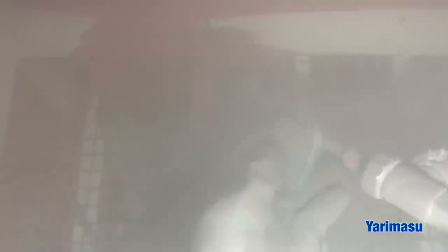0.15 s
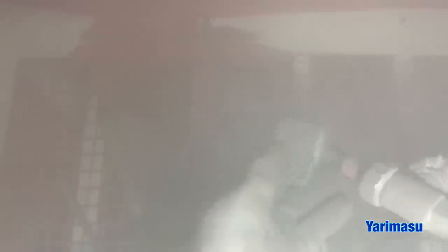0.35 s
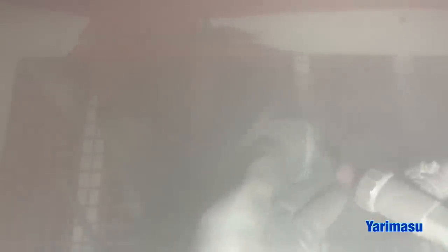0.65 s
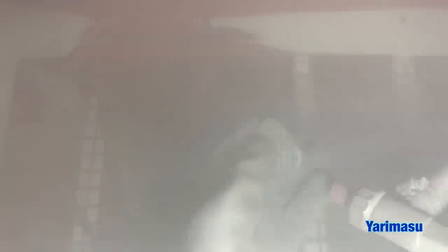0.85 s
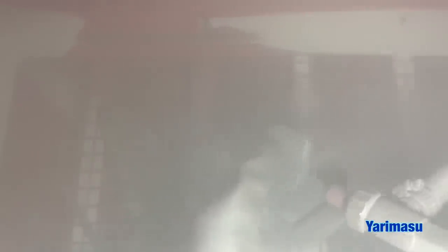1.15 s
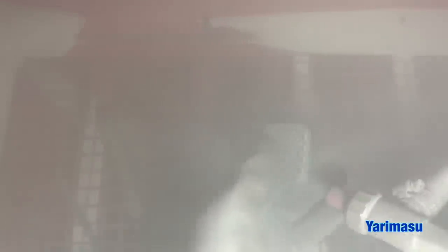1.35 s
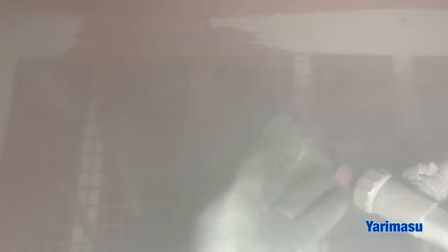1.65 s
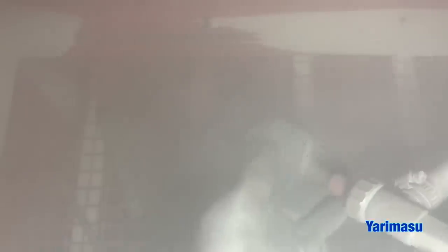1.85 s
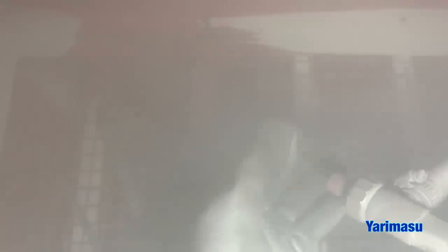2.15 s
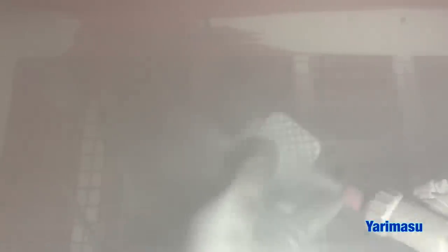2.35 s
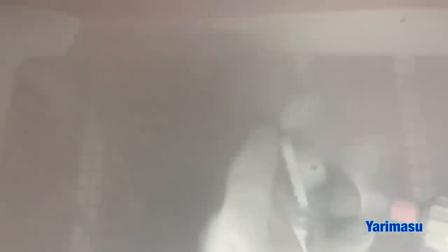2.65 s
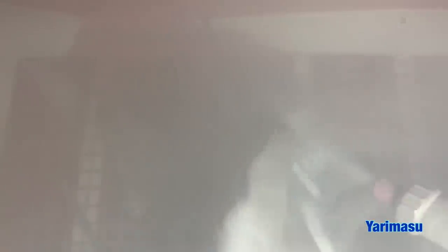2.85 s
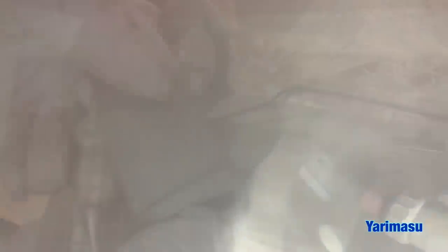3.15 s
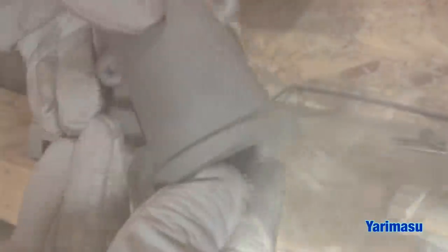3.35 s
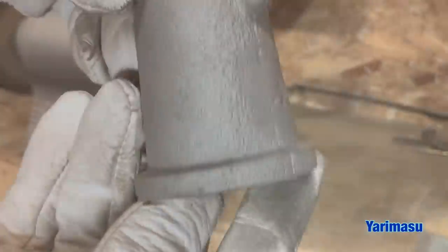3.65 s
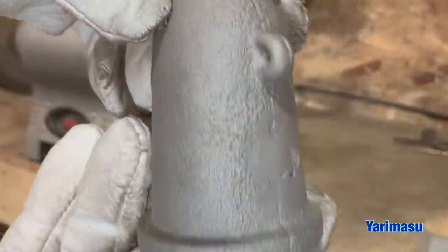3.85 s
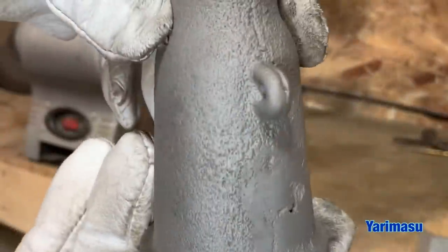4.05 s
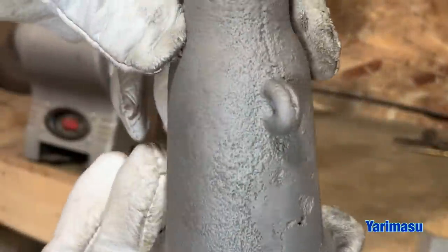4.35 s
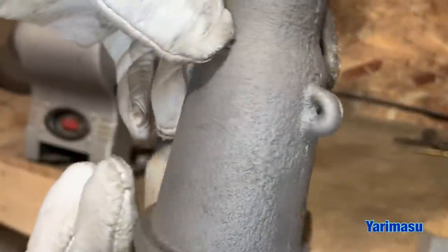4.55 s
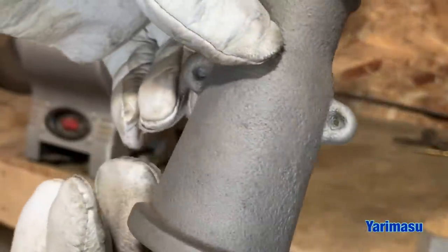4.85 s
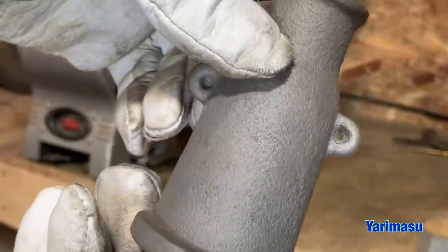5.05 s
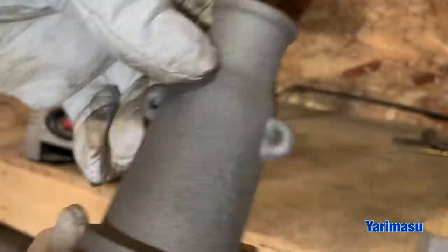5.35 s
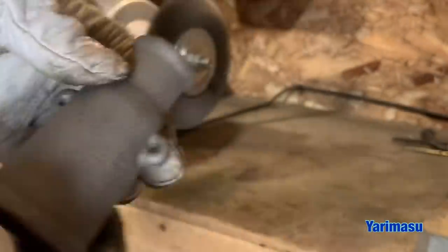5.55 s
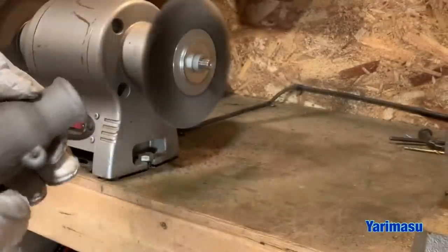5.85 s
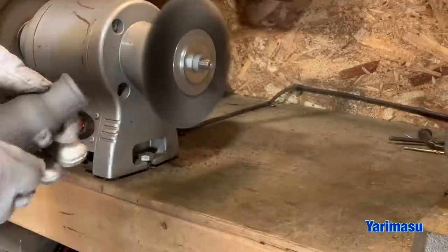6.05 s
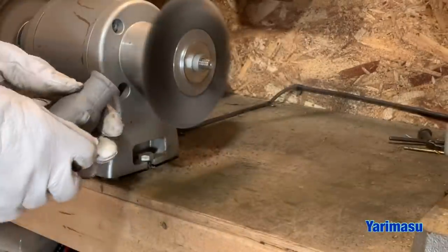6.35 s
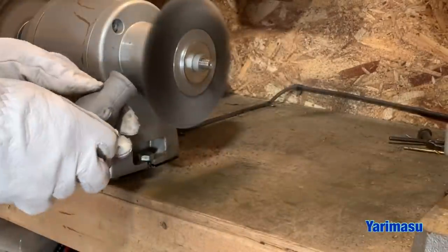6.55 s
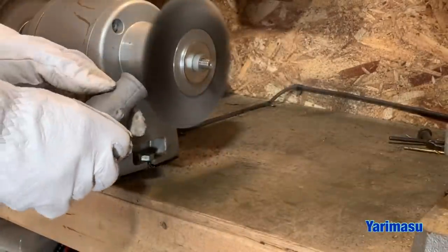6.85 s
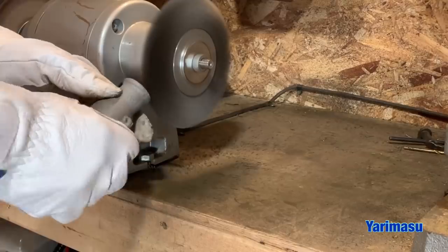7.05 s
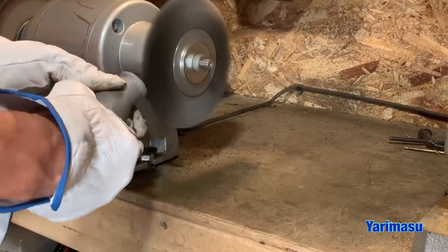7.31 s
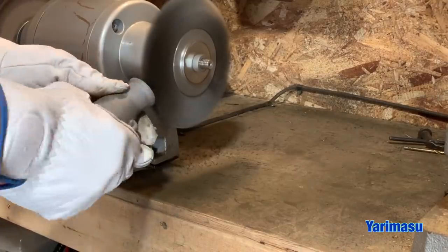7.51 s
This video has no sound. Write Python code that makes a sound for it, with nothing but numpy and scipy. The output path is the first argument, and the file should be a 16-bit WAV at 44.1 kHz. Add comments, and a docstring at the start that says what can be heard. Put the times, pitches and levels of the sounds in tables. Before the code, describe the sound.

Loud sandblasting hiss and throbbing boxy roar cut abruptly at about four seconds to a quiet humming bench grinder, then a casting brushes its wire wheel.

```python
"""Sandblasting cabinet, then bench grinder

A turbulent jet of air and grit hisses on a casting while the steel box roars and resonates and machine tones drone.
At 4.12 s the scene changes abruptly to an idling grinder: harmonic hum, whirring wire wheel, fluttering bearing.
From 6.8 s the casting is held to the wheel: friction scratches, rings it and whistles thinly, and the hum sags.
Noises are shaped random spectra, tones are shaken sinusoids, and both reach two microphone ports."""
import sys
import numpy as np
from scipy import signal
from scipy.fft import rfft, irfft, next_fast_len
from scipy.io import wavfile
from scipy.ndimage import uniform_filter1d

SR = 44100
rng = np.random.default_rng(int(sys.argv[2]) if len(sys.argv) > 2 else 0)


def unload_audio(sound):
    """Save the sound as a 16-bit wav file, at the path given as the first command line argument."""
    columns = np.transpose(np.atleast_2d(sound))
    # keep every value between -1 and 1, then stretch to whole-number steps
    steps = np.round(np.clip(columns, -1, 1) * 32767)
    wavfile.write(sys.argv[1], SR, steps.astype(np.int16))


N = 338688
T = np.arange(N) / SR  # seconds
CHANGE_S = 4.117

# In all tables: levels [dB] and densities [dB per Hz] hold before the trims and modulations in the functions;
# balance_db is left over right; lead_rad is how far left leads, which resonances reduce below 250 Hz.

# Air and grit leaving the nozzle: freq_hz [Hz], density_db [dB per Hz], balance_db [dB]
JET_SPECTRUM = [(1040, -73.5, -12), (1660, -63, 2.5), (2190, -59.3, 5), (2600, -60.3, 9), (3370, -58.8, 10),
                (3850, -59.5, 7.5), (4770, -59.5, 2), (5250, -65, -2), (6100, -71.5, -2.5),
                (7100, -70.5, 0), (8400, -61.5, 0), (9200, -63.5, 0), (10200, -61, 0), (11600, -58, 0),
                (12400, -61, 0), (14340, -63.5, 0), (15500, -75, 0)]
# Steady splash on the casting, drifting as it is turned; only its changes count: start_s [s], level_db [dB]
SPLASH_LEVEL = [(0.0, -27), (0.38, -24.5), (1.32, -24), (2.01, -27.5), (2.61, -26.5), (2.95, -27),
                (3.65, -26), (3.92, -27)]
# Peaks and notches put into the hiss by reflections in the box: centre_hz [Hz], width_hz [Hz], gain_db [dB]
REFLECTION_COLOUR = [(1780, 120, -2), (2560, 70, 1.5), (2820, 70, -2), (2915, 55, 4), (3070, 80, -3.5),
                     (3250, 70, 1.5), (3900, 70, -1.5), (4070, 90, 2), (4280, 70, -2), (4405, 80, 4.5),
                     (4830, 80, 2), (4960, 90, -2.5), (5140, 70, 1.5), (6630, 130, 2.5), (6950, 110, -2.5),
                     (8100, 110, 1.5), (8250, 110, -1.5), (8700, 130, 1.5), (12830, 130, 2)]
# Flares as the jet catches an edge: peak_s [s], length_s [s], centre_hz [Hz], splash_db [dB], spray_db [dB]
EDGE_FLARES = [(1.16, .04, 3300, 1.3, 1), (1.24, 0.05, 3240, 1.5, 1), (1.875, 0.054, 3320, 4, .5),
               (2.215, .075, 3500, 5, 2.5), (2.497, .068, 4600, 6, 2), (2.61, 0.05, 3350, 5.2, 3),
               (2.787, 0.036, 3300, 1.5, 1), (3.06, 0.035, 3400, 4.5, 2.5), (3.335, .03, 3400, 2, .5)]
# The splash fills a broad band; the fine spray outside it follows by a smaller share.
SPLASH_HZ, SPLASH_WIDTH_HZ, SPLASH_SHARE, SPRAY_SHARE = 3300, 2700, 1.05, .3
# Each flare lifts a band around its centre and a band of bright spray.
FLARE_WIDTH_HZ, SPRAY_HZ, SPRAY_WIDTH_HZ = 1500, 7800, 1900

# Turbulent air in the box: freq_hz [Hz], density_db [dB per Hz], balance_db [dB]
ROAR_SPECTRUM = [(15, -49.5, -1), (60, -55, 1), (135, -62, 1), (218, -62.5, 0), (317, -63, -10),
                 (474, -54.3, 2), (610, -59.8, -2), (1030, -61.5, 0), (1590, -61.3, 1), (2260, -61, 3),
                 (4060, -117, 11)]
# Notches cut into the roar by standing waves: centre_hz [Hz], width_hz [Hz], gain_db [dB]
STANDING_WAVE_NOTCHES = [(217, 16, -7), (438, 14, -8), (587, 20, -6), (647, 9, -9), (665, 14, -4),
                         (702, 16, -4)]
# Resonances of box and panels: centre_hz [Hz], width_hz [Hz], density_db [dB per Hz], balance_db [dB],
# lead_rad [rad]
CABINET_MODES = [(38, 5.8, -49.5, -1, 0), (101, 15, -51.5, 1.5, 0.5), (112.5, 1.8, -48.5, 0, 0.8),
                 (170, 12, -49, 6, 0.2), (185, 10, -45.5, -3, -.2), (200, 9, -46, -3, -0.2),
                 (248, 11, -49, -8, 0.2), (274, 23, -54, 3, -0.5), (338.5, 18.4, -53.5, 10, 0),
                 (360, 14, -40.8, -8, 0.6), (395, 17, -51, -6, 0), (548, 14, -45.5, 6, -1.6),
                 (742, 15, -50.5, 9, 1.4), (757, 12, -51, -2, -1.4), (792, 26, -52, 0, 1.5),
                 (1452, 22, -56, 0, .2), (1689, 16, -60, 0, .1), (2030, 37, -61, 1, -1.2)]
# Tones of dust fan and air supply: pitch_hz [Hz], level_db [dB rms], balance_db [dB], lead_rad [rad],
# unsteadiness [ratio]
DRONE_TONES = [(37.9, -42, 0, 0, .4), (113.8, -44, 3, .2, .4), (146.7, -48, 2, -.8, .3),
               (157, -35.5, 10, .1, .2), (167.1, -39.5, 4, .2, .2), (179.7, -38.5, -1, .2, .3),
               (189.7, -21.6, -5, -.2, .11), (205.1, -42, -5, -.2, .3), (227.9, -23.6, -4, 0, .02),
               (250.7, -40.5, -5, -.6, .3), (260.9, -44, -5, -.5, .3), (364.7, -38.5, -8, .7, .4),
               (526.9, -44, -2, .7, .4), (549.8, -34.5, 5, -1.8, .55), (626.3, -43, -6, .3, .55),
               (686.5, -40.5, 0, 2.3, .4), (759.3, -40.5, -2, -1.4, .5), (860.7, -46, -4, -2.3, .5),
               (893, -50.5, -6, 1.1, .5), (968.3, -50, 8, 1.5, .5), (1061.9, -50.5, 5, 1.3, .5),
               (1215.5, -47, -2, .3, .6), (1310.8, -41.5, -2, -.2, .5), (1444.1, -47, -2, .4, .5),
               (1595.5, -48, 5, -.9, .5)]
# Edges of the low bands whose level is held steady: edge_hz [Hz]
LEVELLED_BAND_EDGES = [0, 70, 140, 290, 450, 660, 900]

# Mean pitch of the grinder's hum, sagging under load: start_s [s], pitch_hz [Hz]
HUM_PITCH = [(4.1, 49.6), (6.8, 49.6), (7.05, 49.3), (7.22, 48.7), (7.48, 48.7), (7.58, 48.2), (7.68, 48.3)]
FULL_LOAD_SAG_HZ = .9  # the hum has its loaded colour once it has sagged this far
# Partials of the idling hum: multiple [ratio], level_db [dB]
IDLE_PARTIALS = [(1, 1), (2, -13), (3, -13), (4, -13), (5, -11), (6, -33), (7, -15), (8, -20.5), (9, -31),
                 (10, -33), (11, -25), (12, -25), (13, -17.5), (14, -28), (15, -36), (16, -28), (17, -30),
                 (18, -23), (19, -20.5), (20, -16.5), (21, -26), (22, -29), (23, -25), (24, -26), (26, -29),
                 (33, -34), (34, -31), (44, -36)]
# Partials of the hum under load: multiple [ratio], level_db [dB]
LOADED_PARTIALS = [(1, -2), (2, -17), (3, -9), (4, -9), (5, -3), (6, -20), (7, -8.5), (8, -17), (9, -9),
                   (10, -22), (11, -20), (12, -21), (13, -17), (15, -22), (16, -21), (17, -14), (18, -24),
                   (19, -25), (20, -13), (21, -21), (24, -23), (26, -28), (44, -38)]
PHASE_JUMP_S, PHASE_JUMP_CYCLES = 7.058, 0.296  # the hum's phase jumps back once by a share of a cycle
# Judders after one hard press and at the end of the next: start_s [s], length_s [s],
# gain_db [dB on the loaded hum's low overtones]
WHEEL_JUDDERS = [(7.29, 0.2, 11), (7.61, .06, 9)]
SMOOTH_RUN_DB, JUDDER_RAMP_S = -10, .05  # offset of those overtones, added with or without judder; ramp
# Rough growl while juddering: centre_hz [Hz], width_hz [Hz], density_db [dB per Hz], balance_db [dB],
# lead_rad [rad]
GROWL_MODES = [(245, 30, -71, 0, 0), (370, 120, -79, 0, 0)]

# Air stirred by the wheel: freq_hz [Hz], density_db [dB per Hz], balance_db [dB]
WINDAGE_SPECTRUM = [(20, -97, 0), (60, -91, 0), (110, -85.5, 0), (190, -84.5, 0), (270, -78.5, 0),
                    (364, -75, 1), (543, -80, 2), (810, -86, 2), (1000, -82, 3), (1290, -83.5, 2),
                    (1970, -93.5, 2), (2950, -94.5, .5), (3500, -97, .5), (5970, -98.6, -2),
                    (8500, -91.6, 0), (12000, -95.5, 0), (15600, -106, 0)]
WINDAGE_RISE_DB_PER_S = .5
DIP_S, DIP_LENGTH_S, DIP_DB = 5.34, 0.23, -4.5  # the low whirr dips once
REPEAT_SHARE = .2  # share of the whirr's power that repeats on every turn of the wheel
# Housing tones rung by the bearing knock: pitch_hz [Hz], level_db [dB]
HOUSING_TONES = [(285, -53), (366, -43.5), (455, -56.5), (600, -57), (1030, -59), (1230, -59)]
# Where in the turn the knock peaks (share of a turn), its swell, and the relative scatter of its pitches
KNOCK_PLACE, KNOCK_SWELL_S, KNOCK_SCATTER = .38, .0055, .06
KNOCK_ALTERNATE_DB, KNOCK_CHANCE_DB = 1.0, 1.0  # knocks alternate by plus and minus this; chance spread

# Presses of casting on wheel: start_s [s], length_s [s], brush_db [dB], whistle_db [dB]
CASTING_PRESSES = [(6.762, .11, .7, -7), (6.948, .07, 3.3, -6), (7.09, .175, .3, 1), (7.48, .17, .5, 3.5)]
# The wires bite and let go quickly; their whistle takes longer to build up.
BITE_S, RELEASE_S, WHISTLE_BUILD_S = 0.034, 0.035, 0.084
REST_S, REST_BRUSH_DB, REST_WHISTLE_DB = 6.96, -1.3, -14.5  # light resting contact from here on
# Scratch of the wires: freq_hz [Hz], density_db [dB per Hz], balance_db [dB]
BRUSH_SPECTRUM = [(200, -82, 1), (450, -83, -2), (1300, -90, 3), (2100, -88.5, 3), (3800, -91, 0),
                  (4700, -91.5, -2), (6200, -98, -2), (8500, -92, 0), (11000, -93, 0), (13400, -94, 0),
                  (15500, -100, 0)]
# Notches between the casting's resonances: centre_hz [Hz], width_hz [Hz], gain_db [dB]
SCRATCH_NOTCHES = [(1380, 90, -4), (1600, 90, -4), (1910, 130, -4), (3290, 150, -7), (3720, 260, -4),
                   (4280, 150, -4), (5600, 140, -5)]
# Ring of the casting: centre_hz [Hz], width_hz [Hz], density_db [dB per Hz], balance_db [dB], lead_rad [rad]
CASTING_MODES = [(820, 36, -75.5, 2, -0.56), (995, 39, -75, 2, -0.21), (1190, 40, -78.5, 2, 0),
                 (1470, 50, -86, 2, 0), (1725, 35, -83, 0, -.8), (2040, 40, -86, 2, 0),
                 (2240, 30, -89, 2, 0), (2390, 28, -86, 2, 0.36), (3075, 90, -85.5, 0, 1.2),
                 (4550, 110, -87, -3, .8), (4760, 170, -92, -3, 0), (5040, 110, -91, -3, 0),
                 (5320, 110, -96, -4, -1.3)]
# Whistle of the wire tips: centre_hz [Hz], width_hz [Hz], density_db [dB per Hz], balance_db [dB],
# lead_rad [rad]
WHISTLE_MODES = [(11470, 80, -68.5, 0, 2.2), (11750, 130, -77, 0, 2.0), (11500, 500, -86, 0, 2.4)]

# Soft knocks as the gloves shift on the casting: start_s [s], level_db [dB]
GLOVE_TOUCHES = [(5.605, -3), (5.851, 3), (5.965, -4), (6.325, -2), (6.965, -1), (7.115, -4)]
TOUCH_RISE_S, TOUCH_DECAY_S = .002, .013
# Glove-damped ring of the casting: centre_hz [Hz], width_hz [Hz], density_db [dB per Hz], balance_db [dB],
# lead_rad [rad]
GRIPPED_MODES = [(1040, 170, -69, 2, -.2), (1230, 200, -75, 2, 0)]
TICK_S, TICK_HZ, TICK_DB, TICK_DECAY_S = 5.208, 8600, -40, .0012
# Soft rubs of the gloves: start_s [s], length_s [s], centre_hz [Hz], width_hz [Hz], level_db [dB rms]
GLOVE_RUBS = [(6.13, .13, 570, 140, -54), (6.42, .25, 1220, 300, -57.5)]
RUB_RAMP_S = .04

# The two microphone ports: freq_hz [Hz], likeness [0-1], lead_rad [rad]
PORT_LIKENESS = [(30, .99, 0), (300, .9, 0), (700, .5, 0), (1500, .55, -1), (2400, .3, -1.5),
                 (3200, .3, -3.5), (4500, .25, -5.8), (6000, .15, -6.3), (7200, .95, -6.3),
                 (8000, .9, -6.4), (8600, .72, -7.3), (9400, .65, -8.4), (9900, .98, -9.35),
                 (10400, 1, -9.42), (10900, .99, -9.5), (11400, .85, -10.2), (12300, .7, -11.2),
                 (13300, .98, -12.55), (15500, .9, -12.57)]
BAND_LIMIT_HZ = 15730


def jet(spurt_db=0.3, grit_db=0.25, patch_db=.7, hiss_db=-.2, ripple_db=.5):
    """Turbulent mixing noise: the hiss changes colour as the casting turns; uneven grit feed roughens it."""
    hz, s, z = signal.stft(rush(JET_SPECTRUM), SR, nperseg=1024, noverlap=768)
    hz = hz[:, None]
    splash = np.interp(s, *np.transpose(SPLASH_LEVEL))
    splash = splash - np.mean(splash[s < CHANGE_S])
    near = bell(hz, SPLASH_HZ, SPLASH_WIDTH_HZ)
    db = hiss_db + splash * (near * SPLASH_SHARE + (1 - near) * SPRAY_SHARE)
    db = db + sum(gain_db * bell(hz, centre, width) for centre, width, gain_db in REFLECTION_COLOUR)
    db = db + ripple_db * rng.standard_normal(hz.shape)  # fine ripple from the many later reflections
    for at, length, centre, splash_db, spray_db in EDGE_FLARES:
        splash_lift = splash_db * bell(hz, centre, FLARE_WIDTH_HZ)
        spray_lift = spray_db * bell(hz, SPRAY_HZ, SPRAY_WIDTH_HZ)
        db = db + bell(s, at, length) * (splash_lift + spray_lift)
    # patches of chance level, smoothed over frequency and then time
    patches = uniform_filter1d(rng.standard_normal(db.shape), size=8, axis=0)
    patches = evened(uniform_filter1d(patches, size=16, axis=1))
    hiss = signal.istft(z * amp(db + patch_db * patches), SR, nperseg=1024, noverlap=768)[1][:, :N]
    return hiss * amp(spurt_db * wander(rate_hz=16) + grit_db * wander(rate_hz=340))


def cabinet(roar_db=0., panels_db=0.):
    """Forced resonance: the box roars and rings with the air blown into it."""
    roar = rush(ROAR_SPECTRUM, STANDING_WAVE_NOTCHES)
    return amp(roar_db) * roar + amp(panels_db) * ringing(CABINET_MODES)


def drone(flutter_hz=3.5):
    """Beating of steady tones: the two strongest throb at 38 Hz, and turbulence shakes them all."""
    out, on = np.zeros((2, N)), slice(int((CHANGE_S + .1) * SR))
    for hz, db, balance_db, lead, unsteady in DRONE_TONES:
        out[:, on] += partial(hz * T[on], unsteady, flutter_hz, amp(db) * ports(balance_db, lead))
    return out


def grinder():
    """Superposition: hum, windage and bearing of the turning wheel, plus friction and handling of the casting."""
    hz, = curve(HUM_PITCH)
    turns = np.cumsum(hz * (1 + 0.000988 * wander(rate_hz=1.9))) / SR  # cycles of hum, two per wheel turn
    load = np.clip((hz.max() - hz) / FULL_LOAD_SAG_HZ, 0, 1)
    brushing, whistling = contact()
    friction = brushing * scratch(turns) + whistling * ringing(WHISTLE_MODES)
    return hum(turns, load) + windage(turns, load) + friction + growl() + handling() + rubbing()


def hum(turns, load, hum_db=-42.5, loaded_db=0., unsteady=0.24, rubbing=0.2, flutter_hz=4.3):
    """Harmonic vibration: load trades fundamental for overtones and makes them flutter."""
    out, on = np.zeros((2, N)), slice(int(CHANGE_S * SR), N)
    phase_jump = PHASE_JUMP_CYCLES * np.clip((T - PHASE_JUMP_S) / 0.019 + .5, 0, 1)
    turns = (turns - phase_jump)[on]
    judder = SMOOTH_RUN_DB
    for start, length, db in WHEEL_JUDDERS:
        judder = judder + db * gate(start, length, JUDDER_RAMP_S, JUDDER_RAMP_S)
    load, judder = load[on], judder[on]
    for k, idle_db in IDLE_PARTIALS:
        pressed_db = np.interp(k, *np.transpose(LOADED_PARTIALS)) + loaded_db
        pressed_db = pressed_db + judder * bell(k, 6.6, 4.0)
        depth = (unsteady + rubbing * load) * (1 - 1 / k) ** 2  # the fundamental stays steady
        pair = ports(0., 0.045 * k * rng.standard_normal())
        level = amp(idle_db + load * (pressed_db - idle_db))
        out[:, on] += level * partial(round(k) * turns, depth, flutter_hz, pair)
    return amp(hum_db) * out


def windage(turns, load, air_db=-.3, load_db=-2.0, gust_db=.6):
    """Rotational modulation of stirred air: its low whirr partly repeats, flutters with the bearing and dips."""
    wind = rush(WINDAGE_SPECTRUM)
    low = signal.sosfiltfilt(signal.butter(2, 1800, fs=SR, output="sos"), wind)
    whirr = recurring(low, turns, share=REPEAT_SHARE)
    whirr = whirr * swish(turns, depth=0.48) * amp(gust_db * wander(rate_hz=6))
    dip = amp(DIP_DB * gate(DIP_S, DIP_LENGTH_S, attack_s=.04, release_s=.02))
    whirr = (whirr + rattle(turns)) * dip
    level_db = air_db + WINDAGE_RISE_DB_PER_S * (T - CHANGE_S) + load_db * load
    return amp(level_db) * (whirr + (wind - low) * swish(turns, depth=0.17))


def scratch(turns, brush_db=-1.2, ring_db=-2.0, snag_db=1.0, tips_db=1.5):
    """Friction excitation: the wires scratch in broad noise and ring the casting's modes."""
    wires = amp(brush_db) * rush(BRUSH_SPECTRUM, SCRATCH_NOTCHES) * swish(turns, depth=0.18)
    ring = amp(ring_db) * ringing(CASTING_MODES)
    # wires snag and their tips tick
    return (wires + ring) * amp(snag_db * wander(rate_hz=70) + tips_db * wander(rate_hz=300))


def contact():
    """Power addition: light resting contact and each press set the strength of brushing and whistle."""
    resting = np.clip((T - REST_S) / BITE_S, 0, 1)
    brushing = (amp(REST_BRUSH_DB) * resting) ** 2
    whistling = (amp(REST_WHISTLE_DB) * resting) ** 2
    for start, length, brush_db, whistle_db in CASTING_PRESSES:
        brushing = brushing + (amp(brush_db) * gate(start, length, BITE_S, RELEASE_S)) ** 2
        whistling = whistling + (amp(whistle_db) * gate(start, length, WHISTLE_BUILD_S, RELEASE_S)) ** 2
    return np.sqrt(brushing), np.sqrt(whistling)


def growl():
    """Gated resonance: the wheel chatters roughly against the casting during each judder."""
    juddering = sum(gate(start, length, JUDDER_RAMP_S, JUDDER_RAMP_S) for start, length, _ in WHEEL_JUDDERS)
    return ringing(GROWL_MODES) * juddering


def swish(turns, depth):
    """Periodic modulation: uneven wire tufts pass once every two hum cycles, more weakly in between."""
    angle = np.pi * (turns - 2 * KNOCK_PLACE)
    tufts = np.exp(3 * (np.cos(angle) - 1)) + 0.84 * np.exp(6 * (np.cos(2 * angle) - 1))
    return evened(1 + depth * tufts)


def recurring(noise, turns, share):
    """Cyclic repetition: the same wires pass on every turn, so part of their noise repeats."""
    period, angle = 2 * SR / HUM_PITCH[0][1], turns / 2 % 1
    first, second = (np.array([np.interp((angle + k) * period, np.arange(N), side) for side in noise])
                     for k in (0, 1))
    share = np.clip(share, 0, 1)
    # fading between two stretches makes a seamless loop
    looped = np.sin(np.pi / 2 * angle) * first + np.cos(np.pi / 2 * angle) * second
    return np.sqrt(share) * looped + np.sqrt(1 - share) * noise


def rattle(turns, rattle_db=-1., balance_db=0.):
    """Impact excitation: play in the bearing rings the housing once a turn, alternately strong and weak."""
    out, age = np.zeros(N), T[:SR // 16]
    shape = age / KNOCK_SWELL_S * np.exp(1 - age / KNOCK_SWELL_S)
    hz, db = np.transpose(HOUSING_TONES)[:, :, None]
    peaks = np.flatnonzero(np.diff(np.floor(turns / 2 - KNOCK_PLACE)))
    for turn, peak in enumerate(peaks):
        scatter, phase = rng.standard_normal(hz.shape), rng.random(hz.shape)
        tones = np.sin(2 * np.pi * (hz * (1 + KNOCK_SCATTER * scatter) * age + phase))
        ring = (amp(db) * tones).sum(0)
        strength_db = KNOCK_ALTERNATE_DB * (-1) ** turn + KNOCK_CHANCE_DB * rng.standard_normal()
        knock = amp(strength_db) * shape * ring
        part = out[peak - int(KNOCK_SWELL_S * SR):][:len(age)]
        part += knock[:len(part)]
    return amp(rattle_db) * ports(balance_db, 0).real[:, None] * out


def handling():
    """Damped resonance: soft knocks of the gripped casting, and one tiny sharp tick."""
    age, knocks, tick = T[:SR // 4], np.zeros(N), np.zeros(N)
    knock = np.minimum(age / TOUCH_RISE_S, 1) * np.exp(-age / TOUCH_DECAY_S)
    for at, db in GLOVE_TOUCHES:
        knocks[int(at * SR):][:len(age)] += amp(db) * knock
    decay = amp(TICK_DB) * np.exp(-age / TICK_DECAY_S)
    tick[int(TICK_S * SR):][:len(age)] = decay * np.sin(2 * np.pi * TICK_HZ * age)
    return knocks * ringing(GRIPPED_MODES) + tick


def rubbing():
    """Sliding friction: each slide of a glove is a brief, dull band of noise."""
    out = np.zeros(N)
    for start, length, hz, width, db in GLOVE_RUBS:
        on = slice(int(start * SR), int((start + length + RUB_RAMP_S) * SR))
        friction = signal.lfilter(*signal.iirpeak(hz, hz / width, fs=SR), rng.standard_normal(SR))
        ramp = gate(start, length, RUB_RAMP_S, RUB_RAMP_S)[on]
        out[on] += amp(db) * evened(friction)[:len(out[on])] * ramp
    return out


def rush(rows, notches=()):
    """Partial coherence: broad noise that the two ports share more or less by frequency."""
    hz = np.fft.rfftfreq(N, 1 / SR)
    db, balance_db = spectrum(rows, hz)
    db = db + sum(gain_db * bell(hz, centre, width) for centre, width, gain_db in notches)
    same, lead = spectrum(PORT_LIKENESS, hz)
    same, left = np.clip(same, 0, 1), white()
    right = same * left + np.sqrt(1 - same ** 2) * white()
    return irfft(np.array([left, right]) * amp(db) * ports(balance_db, lead), N)


def ringing(modes):
    """Noise-driven resonance: each mode has its own noise; long waves reach both ports in step."""
    hz = np.fft.rfftfreq(N, 1 / SR)
    noise, out = white(), np.zeros((2, len(hz)), complex)
    shifts = rng.integers(0, len(hz), len(modes))  # each mode reads the noise from another place
    for (centre, width, db, balance_db, lead), shift in zip(modes, shifts):
        near = np.arange(*np.searchsorted(hz, [centre - 20 * width, centre + 20 * width]))
        peak = amp(db) / (1 + (1.3 * (hz[near] - centre) / width) ** 2)
        pair = ports(balance_db, lead * min(1, centre / 250) ** 2)
        out[:, near] += pair[:, None] * peak * noise[near - shift]
    return irfft(out, N)


def partial(cycles, depth, flutter_hz, pair):
    """Quadrature modulation: a tone of rms 1 before the port gains, shaken in level and phase."""
    angle = (2 * np.pi * ((cycles + rng.random()) % 1)).astype(np.float32)
    cos, sin = np.cos(angle), np.sin(angle)
    along = 1 + depth * wander(flutter_hz, size=len(angle))
    across = depth * wander(flutter_hz, size=len(angle))
    tone = np.array([along * cos - across * sin, along * sin + across * cos]) / np.sqrt(.5 + depth ** 2)
    return pair.real[:, None] * tone[0] - pair.imag[:, None] * tone[1]


def levelled(x, strength=0.79, response_s=0.05):
    """Multiband gain control: each low band is turned down as it swells and up as it sinks."""
    hz, z = np.fft.rfftfreq(N, 1 / SR), rfft(x)
    out, span = x.copy(), int(response_s * SR)
    for low, high in zip(LEVELLED_BAND_EDGES, LEVELLED_BAND_EDGES[1:]):
        band = irfft(z * (np.tanh((hz - low) / 10) - np.tanh((hz - high) / 10)) / 2, N)
        power = uniform_filter1d(uniform_filter1d((band ** 2).mean(0), span), span // 2)
        power = abs(power) + 1e-12
        gain = (power / power[T < CHANGE_S].mean()) ** (-np.clip(strength, 0, 1) / 2)
        out += band * (gain - 1)
    return out


def white():
    """Flat power density: spectrum of noise with 0 dB per Hz."""
    return rfft(rng.standard_normal(N)) * np.sqrt(SR / 2)


def wander(rate_hz, size=N):
    """Low-passed chance: smooth, rms about 1, about as fast as rate_hz."""
    step = 64  # samples between interpolated points
    count = next_fast_len(size // step + 2)
    f = np.fft.rfftfreq(count, step / SR)
    slow = evened(irfft(rfft(rng.standard_normal(count)) / (1 + (f / rate_hz) ** 4), count))
    return (slow[:-1, None] + np.diff(slow)[:, None] * np.arange(step) / step).ravel()[:size]


def ports(balance_db, lead):
    """Level and phase difference: complex gains of the left and right port."""
    return np.array([amp(balance_db / 2) * np.exp(1j * lead), amp(-balance_db / 2) + 0j])


def gate(start, length, attack_s, release_s):
    """Linear envelope: attack, hold and release; the release begins after length."""
    return np.clip((T - start) / attack_s, 0, 1) * np.clip(1 - (T - start - length) / release_s, 0, 1)


def bell(x, centre, width):
    """Gaussian weighting: a smooth hump of height 1."""
    return np.exp(-np.minimum(2 * ((x - centre) / width) ** 2, 20))


def spectrum(rows, hz):
    """Logarithmic frequency scale: columns of a table interpolated along it."""
    f, *columns = np.transpose(rows)
    return [np.interp(np.log(hz + 1), np.log(f + 1), c) for c in columns]


def curve(rows):
    """Linear interpolation in time: columns of a table at every sample."""
    s, *columns = np.transpose(rows)
    return [np.interp(T, s, c) for c in columns]


def amp(db):
    """Decibel definition: level to amplitude ratio."""
    return np.exp(np.asarray(db) * (np.log(10) / 20))


def evened(x):
    """Power normalization: scale to rms 1."""
    return x / np.sqrt(np.mean(abs(x) ** 2) + 1e-20)


def scene(fade_s=0.0045, grinder_balance_db=-0.55):
    """Exponential crossfade: the blasting dies within milliseconds as the grinder takes over."""
    blasting = np.exp(-np.maximum(T - CHANGE_S, 0) / fade_s)
    blast = levelled(jet() + cabinet() + drone())
    grinding = ports(grinder_balance_db, 0).real[:, None] * grinder()
    return blasting * blast + (1 - blasting) * grinding


def record(dry):
    """Band limitation: the recorder cuts the deepest bass and the highest treble."""
    dry = signal.sosfilt(signal.butter(2, 18, "high", fs=SR, output="sos"), dry)
    lowpass = signal.firwin(1023, BAND_LIMIT_HZ, window=("kaiser", 9), fs=SR)
    return signal.oaconvolve(dry, lowpass[None], "same")


dry = scene()
out = record(dry)
unload_audio(out)
```